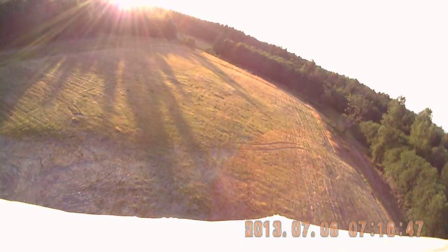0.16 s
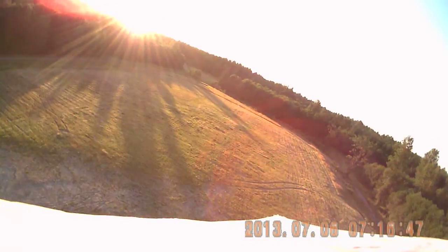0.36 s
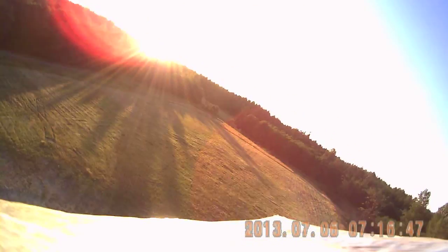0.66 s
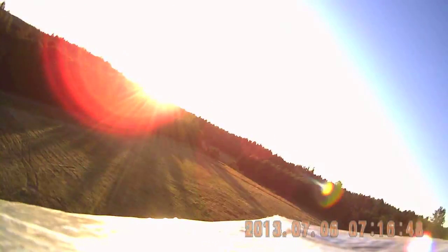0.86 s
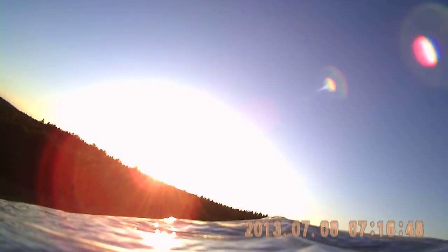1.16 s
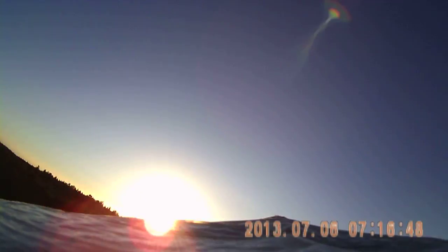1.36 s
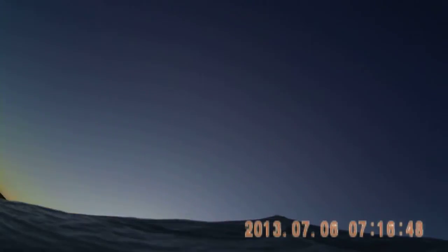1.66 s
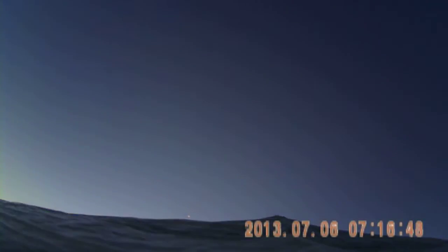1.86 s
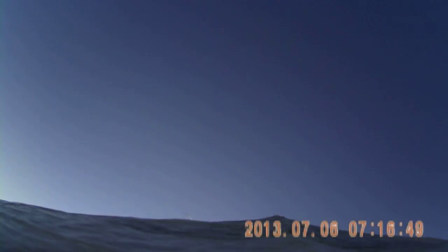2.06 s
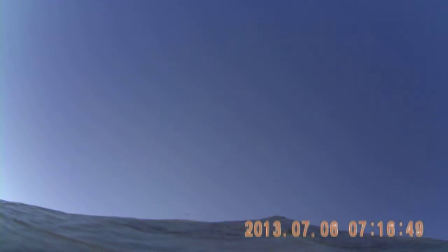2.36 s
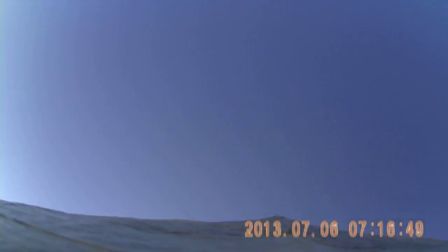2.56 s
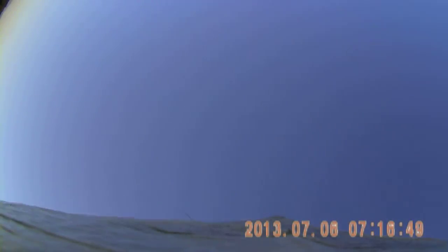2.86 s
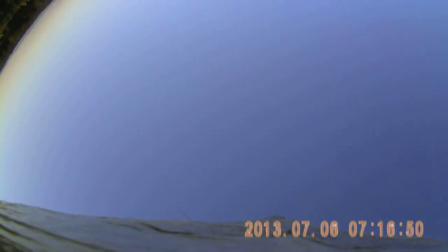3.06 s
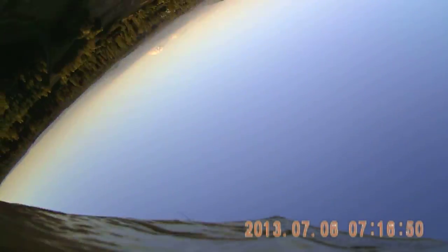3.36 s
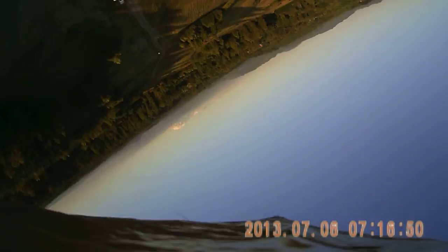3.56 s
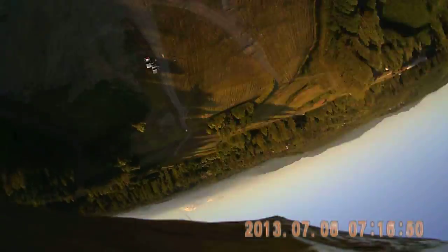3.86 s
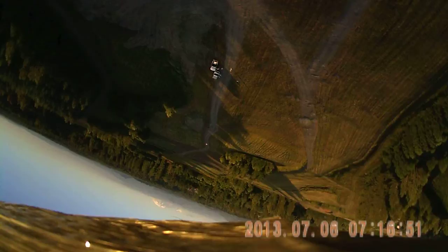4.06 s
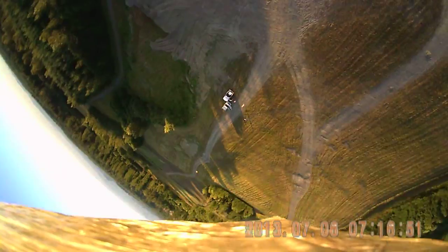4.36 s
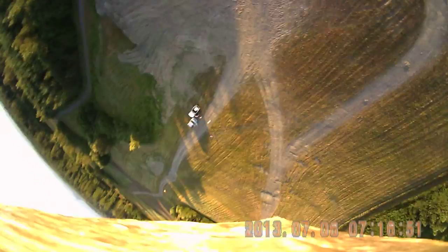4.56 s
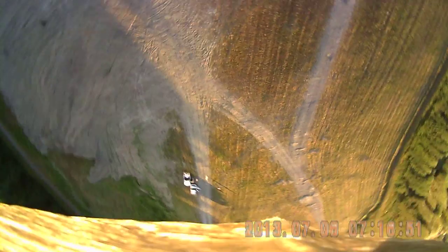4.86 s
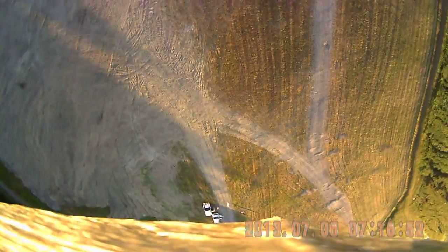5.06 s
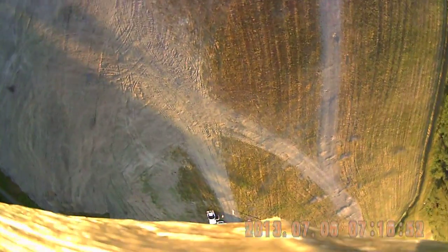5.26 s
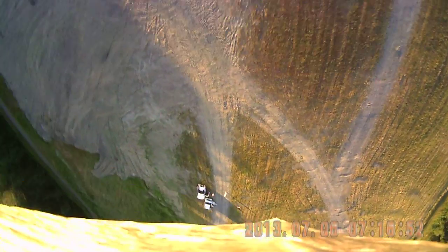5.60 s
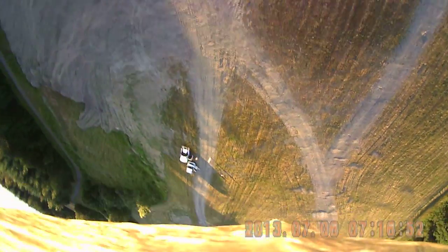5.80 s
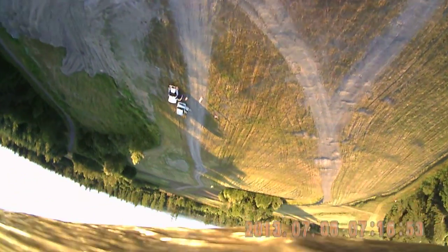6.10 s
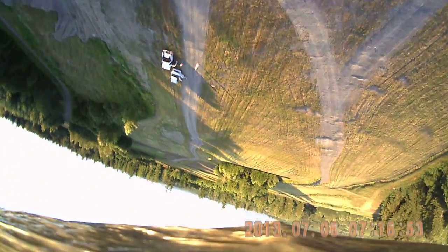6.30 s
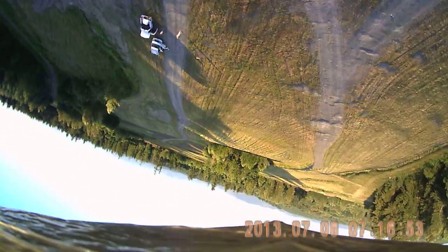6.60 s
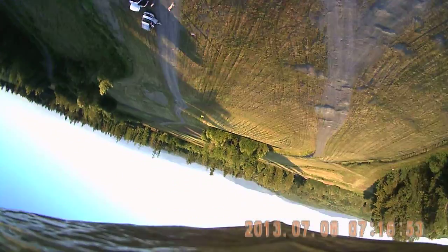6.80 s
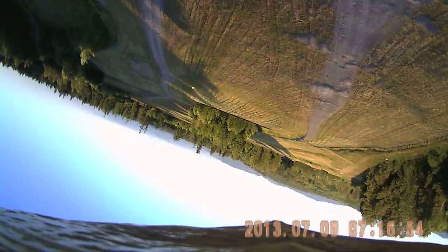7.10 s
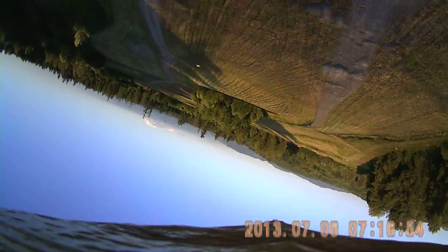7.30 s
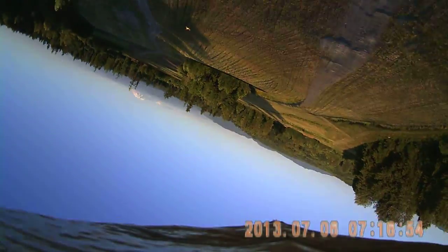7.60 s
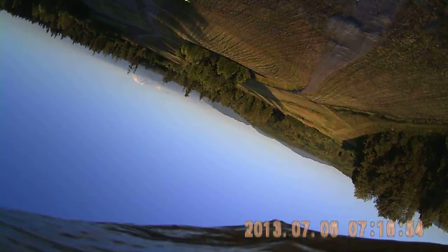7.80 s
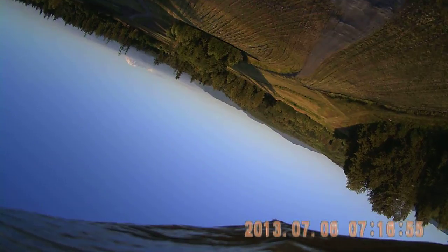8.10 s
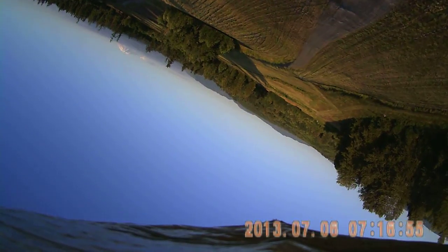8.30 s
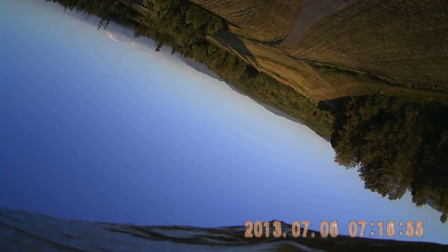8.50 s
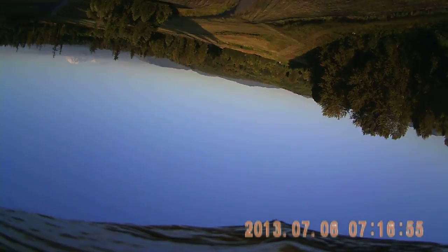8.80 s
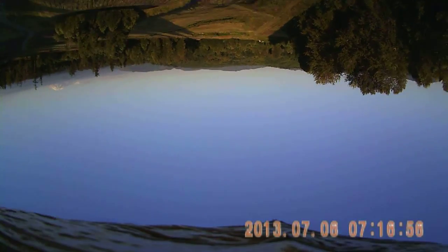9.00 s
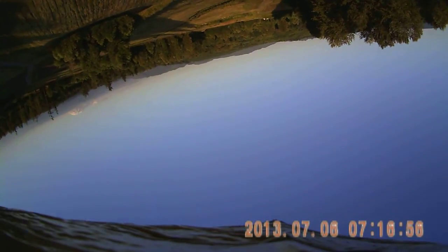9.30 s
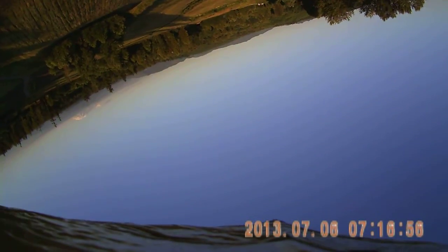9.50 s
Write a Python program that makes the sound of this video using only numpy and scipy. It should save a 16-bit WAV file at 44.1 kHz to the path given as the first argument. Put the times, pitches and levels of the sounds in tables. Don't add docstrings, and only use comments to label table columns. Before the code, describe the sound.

A raspy, low-pitched propeller buzz runs throughout, very close and gritty, with low-fidelity sound. Strong wind at first, a brief cluster of clipped thuds, then quieter air and a purer motor drone as the plane slows. The pitch dips suddenly near the middle, wind swells in the dive, and an uneven, fluttering buzz continues before the air gradually softens.

```python
import sys
import numpy as np
from scipy import signal
from scipy.fft import rfft, irfft, next_fast_len
from scipy.io import wavfile
from scipy.ndimage import uniform_filter1d

SR = 44100
rng = np.random.default_rng(int(sys.argv[2]) if len(sys.argv) > 2 else 0)


def voltage_ratio(level):
    return 10 ** (np.asarray(level, float) / 20)


def generate_wav(signal):
    frames = np.transpose(np.atleast_2d(signal))
    scaled = np.clip(frames, -1, 1) * 32767
    pcm = np.round(scaled).astype(np.int16)
    wavfile.write(sys.argv[1], SR, pcm)


N = 425550
CRUISE_DB, CRUISE_HZ = -33, 170

GUSTY = [.85, .32, .75]


def in_time(rows):
    seconds, *columns = np.transpose(rows)
    return [np.interp(np.arange(N) / SR, seconds, column) for column in columns]


def by_attitude(values):
    # time in seconds, attitude (0 at speed, 1 stall, 2 inverted).
    attitude = [(0.0, 0.11), (1.8, 0.00094), (2.8, 0.67), (4.0, 1.35), (4.3, 1.82), (4.55, 1.72),
                (4.7, 1.1), (4.9, 1.66), (5.3, 1.8), (5.7, 1.916), (9.65, 1.97)]
    return np.interp(in_time(attitude)[0], range(3), values)


def drift(rate_hz):
    pole = np.exp(-80 * np.pi * rate_hz / SR)
    noise = rng.standard_normal(N // 40 + 2002)
    slow = signal.lfilter([1], [1, -2 * pole, pole * pole], noise)[2000:]
    return np.interp(np.arange(N) / 40, np.arange(len(slow)), slow / slow.std())


def coloured(spectrum):
    size = next_fast_len(N)
    hz, db = np.transpose(spectrum)
    bins_hz = np.maximum(np.fft.rfftfreq(size, 1 / SR), 1)
    gain = voltage_ratio(np.interp(np.log(bins_hz), np.log(hz), db, -90, -90))
    noise = irfft(rfft(rng.standard_normal(size)) * gain, size)[:N]
    return noise / noise.std()


def load_shift(order):
    # centre in seconds, half width in seconds, shaft order, level change in dB.
    shifts = [(3, .4, 1, -0.5), (4.5, .2, 1, 0.5), (6.33, 0.22, 1, -12.5), (7.3, 0.37, 1, -7),
              (5.5, 0.7, 1, 3.5), (2.1, .3, 2, -2.5), (4.5, .35, 12, 2.5), (3.894, 0.13, 2, 4.5),
              (4.8, 0.12, 2, -7), (5.75, 0.1, 2, 2.5), (7.537, 0.42, 2, 2), (9.2, .2, 2, -4), (4, .2, 6, 0),
              (4.3, .2, 6, -0.5), (4.74, 0.18, 6, 0.5), (7.0, .4, 6, 1), (8.67, 1.3, 6, -2.5),
              (4.55, 0.26, 14, 5), (4.0, 0.55, 3, 3), (6.7, 1.9, 3, -4), (9.25, 0.35, 3, 7.5),
              (2.9, 0.12, 5, 6.5), (4.35, 0.1, 5, 3), (5, 0.46, 5, 2), (6.7, 0.22, 5, -3),
              (6.8, .15, 7, -4), (4.9, .3, 7, -6), (6.45, 0.16, 7, 6.5), (7.35, 0.14, 7, 8.5),
              (5.1, 0.62, 10, 3.5)]
    t = np.arange(N) / SR
    return sum(db * np.exp(-((t - s) / width) ** 2) for s, width, k, db in shifts if round(k) == order)


def partial(angle, order, level_db, lag, wobble_db):
    gusts = np.minimum(drift(8.2), 1.3)
    waver_db = wobble_db * by_attitude(GUSTY) * gusts
    level = np.sqrt(2) * voltage_ratio(level_db + load_shift(order) + waver_db)
    return -level * np.cos(order * angle + lag)


def blade_dips(angle, dips_db):
    # shaft order, level in dB at speed, level in dB near the stall, level in dB inverted.
    dip_shape = [(6, 4.5, 2.5, 2.5), (7, -22, -8, -10.5), (8, 2, -2, 0.5), (9, -26.5, -11.5, -20.5),
                 (10, -0.5, -3, -5.5), (11, -27, -9.5, -17.5), (12, -2.5, -4, -10.5),
                 (13, -28.5, -14.5, -19.5), (14, -3.5, -7, -16.5), (15, -26.5, -13.5, -28),
                 (16, -5.5, -11.5, -18.5), (17, -26.5, -13.5, -30), (18, -9, -20, -9),
                 (19, -29, -13, -26.5), (20, -6, -20, -8), (21, -20.5, -15, -15), (22, -30, -20, -6),
                 (24, -43.5, -39, -22.5)]
    late_rad = [0.29, 0.21, .5]
    late = by_attitude(late_rad)
    dips = 0
    for order, *shape_db in dip_shape:
        order = round(order)
        odd = order % 2
        lag = -late * max(order - 10, 0) - 1.4 * odd
        dips = dips + partial(angle, order, dips_db + by_attitude(shape_db), lag, 0.91 + 3.0 * odd)
    return dips


def airframe(angle, unbalance_db, thrust_db, drum_db, odd_db):
    drum_lag = by_attitude([-.5, -.7, .6])
    return (partial(angle, order=1, level_db=unbalance_db, lag=0.57, wobble_db=0.5)
            + partial(angle, order=2, level_db=thrust_db, lag=-0.8, wobble_db=1.7)
            + partial(angle, order=3, level_db=odd_db + 0.5, lag=-0.96, wobble_db=2.0)
            + partial(angle, order=4, level_db=drum_db, lag=drum_lag, wobble_db=1.57)
            + partial(angle, order=5, level_db=odd_db - 1.5, lag=-1.3, wobble_db=6.0))


def air(angle, rush_db):
    # frequency in Hz, level in dB per Hz.
    buffet_colour = [(12, -29.5), (20, -15), (30, -9.5), (50, -4), (80, -2.5), (125, -1.5), (250, -5.5),
                     (400, -12.5), (900, -33)]
    rush_colour = [(150, -19), (300, -3.5), (450, -2.5), (620, -4.5), (950, -8.5), (1300, -11.5),
                   (2000, -17.5), (2800, -17.5), (4000, -30)]
    wake_colour = [(400, -26), (900, -8.5), (1300, -8.5), (1700, -5), (2300, -1.5), (3000, -4),
                   (3600, -2.5), (4200, 5), (5200, -8)]
    faster_db = rush_db - CRUISE_DB
    pitch_over_s, pitch_over_width_s, pitch_over_db = 4.88, 0.19, 3
    pitch_over = np.exp(-((np.arange(N) / SR - pitch_over_s) / pitch_over_width_s) ** 2)
    buffet_db = -23 + 0.83 * faster_db + pitch_over_db * pitch_over
    wake_db = -43.5 + 0.48 * faster_db
    gust = drift(7.9)

    limit = 3.0
    swings = limit * np.tanh(coloured(buffet_colour) / limit)
    buffet = voltage_ratio(buffet_db + 4.0 + 0.1 * gust) * swings
    rush = voltage_ratio(rush_db + 7.0 + 0.5 * gust + 0.75 * drift(25.0)) * coloured(rush_colour)
    both_blades_db = 6.9 * ((1 + np.cos(2 * angle - .6)) / 2) ** 3
    puff = voltage_ratio(both_blades_db + 1.6 * np.cos(angle - .4))
    wake = voltage_ratio(wake_db + 11.0 + 0.31 * drift(40.0)) * puff * coloured(wake_colour)
    return buffet + rush + wake


def eddies(angle):
    # time in seconds, depth in dB.
    eddy_events = [
        (1.455, -7),
        (1.494, -6),
        (1.5028, -6),
        (1.5725, -7),
        (1.6585, -4),
        (1.740, -5),
        (1.8155, -8),
        (1.8865, -4.5),
        (1.9355, -6.5),
    ]
    half_width_s = .0008
    t = np.arange(N) / SR
    passes = t[1:][np.diff(angle // np.pi) > 0]
    pressure = 0
    for s, depth_db in eddy_events:
        centre = passes[np.argmin(np.abs(passes - s))]
        pressure = pressure - voltage_ratio(depth_db) * np.exp(-((t - centre) / half_width_s) ** 2)
    return pressure


def controller(angle, speed_db):
    # switching frequency in Hz, shaft order taken off it, level in dB.
    switching = [(8140, 24, -52), (8140, 26, -53), (8140, 28, -54), (8140, 30, -56), (7990, 38, -51)]
    fades_above_db, fade_db_per_db = -41.5, 5
    heard_db = 2.0 - fade_db_per_db * np.maximum(speed_db - fades_above_db, 0)
    clock = 2 * np.pi * np.arange(N) / SR + 0.00015 * drift(12.0)
    return sum(np.sqrt(2) * voltage_ratio(db + heard_db) * np.cos(hz * clock - order * angle)
               for hz, order, db in switching)


def scene():
    # time in seconds, shaft turns in Hz.
    shaft = [(0.0, 190.9), (1.0, 189.2), (1.8, 184.6), (2.35, 181.0), (3.0, 179.2), (3.9, 178.8),
             (4.62, 181.0), (4.75, 170.3), (4.86, 168.7), (5.0, 169.9), (5.12, 164.9), (5.26, 163.5),
             (5.9, 167.6), (6.8, 168.0), (6.96, 170.8), (7.5, 170.6), (8.55, 168.4), (9.65, 168.5)]
    # time in seconds, level in dB.
    airspeed = [(0.0, -26), (0.8, -28), (1.45, -30), (1.6, -31.5), (2.0, -35), (2.4, -38), (2.8, -43),
                (3.3, -48), (4.0, -45.5), (4.4, -42), (4.8, -37.5), (5.3, -33.5), (6.2, -31.5), (7.2, -32),
                (8.0, -34.5), (8.8, -36.5), (9.65, -40)]
    # time in seconds, level in dB.
    flex = [(0.0, -17.5), (0.6, -21), (1.2, -16.5), (1.8, -22.5), (2.4, -29.5), (3.0, -29.5), (3.9, -33.5),
            (4.2, -30), (4.53, -20.5), (4.65, -25.5), (4.8, -34.5), (5.05, -27.5), (5.35, -36),
            (5.55, -26.5), (6.1, -28), (6.45, -24), (8.2, -24.5), (9.65, -29.5)]
    odd_under_flex = [-22.5, -10, -7]
    (shaft_hz,), (speed_db,), (flex_db,) = in_time(shaft), in_time(airspeed), in_time(flex)
    shaft_hz = uniform_filter1d(shaft_hz, size=SR // 25)
    faster_db, quicker_hz = speed_db - CRUISE_DB, shaft_hz - CRUISE_HZ
    jitter = 0.0067 * by_attitude(GUSTY) * drift(60.0)
    angle = 2 * np.pi * np.cumsum(shaft_hz) / SR + jitter

    dips_db = -31 + 0.25 * faster_db + 0.0982 * quicker_hz
    unbalance_db = -24.5 + 0.27 * faster_db + 0.1979 * quicker_hz
    thrust_db = -24 + 0.21 * faster_db
    odd_db = flex_db + by_attitude(odd_under_flex)
    propeller = blade_dips(angle, dips_db) + airframe(angle, unbalance_db, thrust_db, flex_db, odd_db)
    return (propeller + air(angle, speed_db) + eddies(angle) + controller(angle, speed_db))[None]


def roll_off(x):
    return signal.sosfilt(signal.butter(12, 15830, fs=SR, output="sos"), x)


def record(dry):
    up, down, taps = 441, 80, 26
    converter_top, knee, rounding, ceiling = .692, .645, 20, .706
    low = np.clip(signal.resample_poly(dry, down, up, axis=1), -converter_top, converter_top)
    soft = signal.firwin(taps * up + 1, 0.98 / up, window=("kaiser", 9.0))
    full = signal.resample_poly(low, up, down, axis=1, window=soft)[:, :N]
    full = np.pad(full, ((0, 0), (0, N - full.shape[1])))
    over = np.maximum(np.abs(full) - knee, 0)
    full = full - np.sign(full) * rounding * over ** 3
    return roll_off(np.clip(full, -ceiling, ceiling))


dry = scene()
out = record(dry)
generate_wav(out)
```